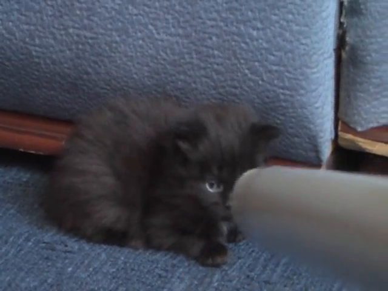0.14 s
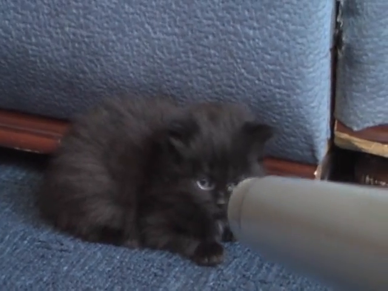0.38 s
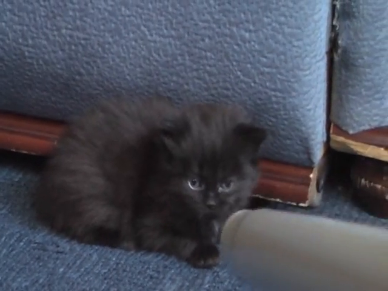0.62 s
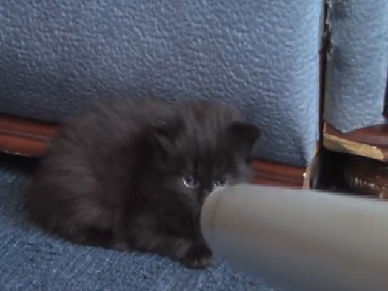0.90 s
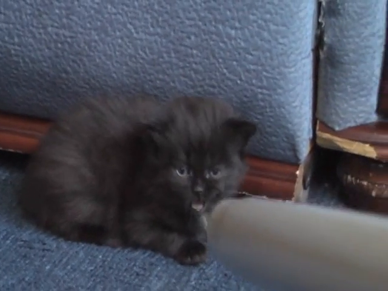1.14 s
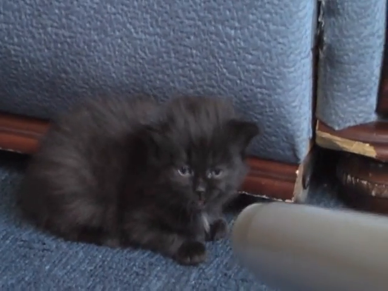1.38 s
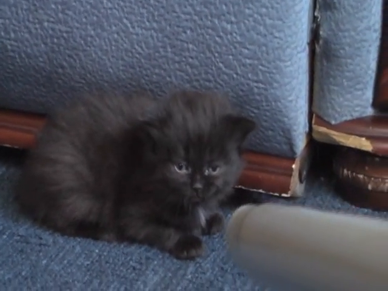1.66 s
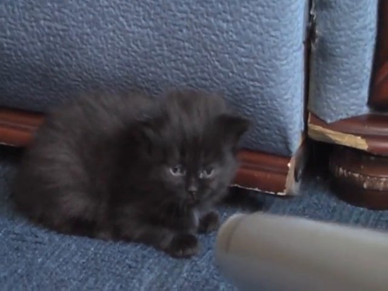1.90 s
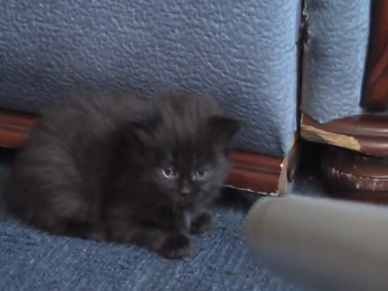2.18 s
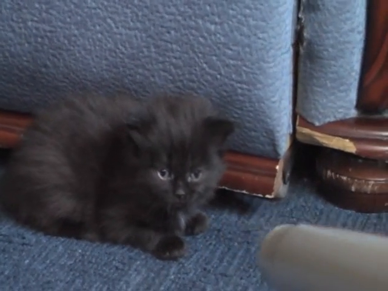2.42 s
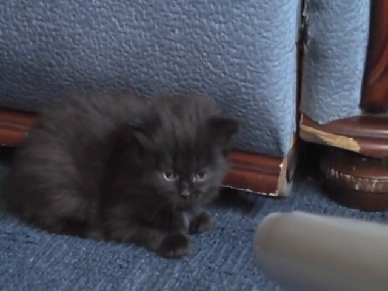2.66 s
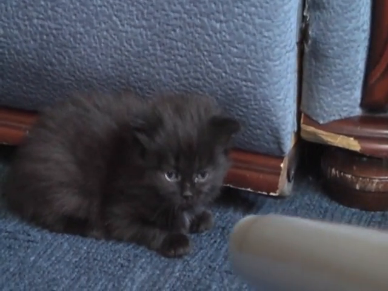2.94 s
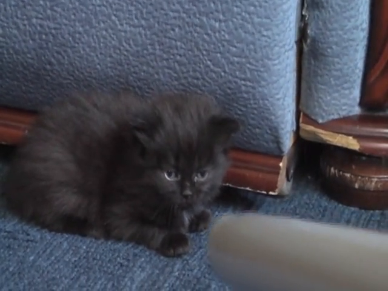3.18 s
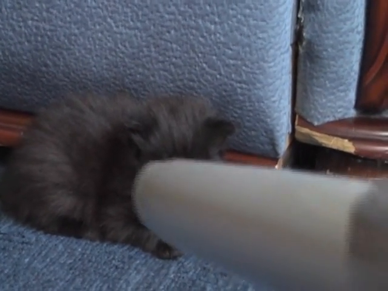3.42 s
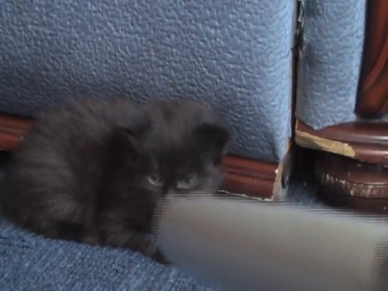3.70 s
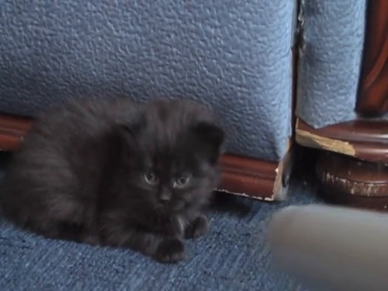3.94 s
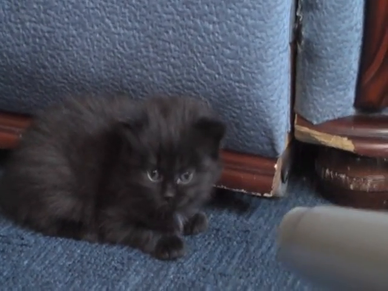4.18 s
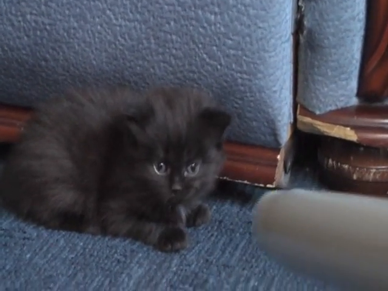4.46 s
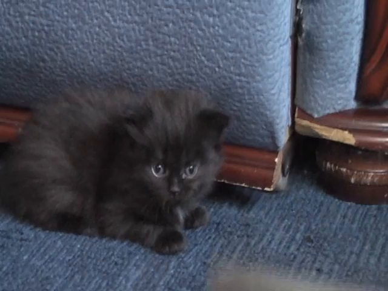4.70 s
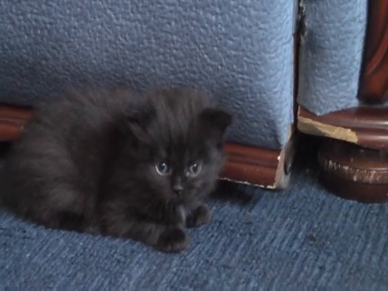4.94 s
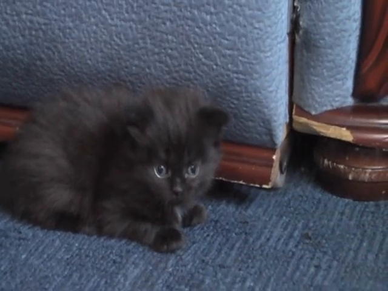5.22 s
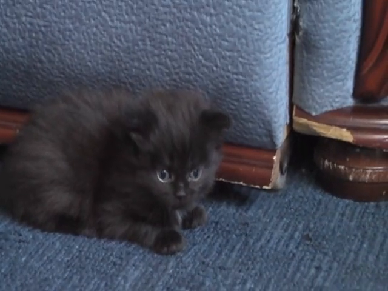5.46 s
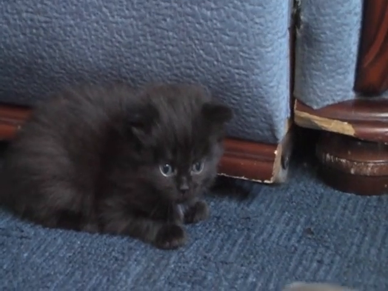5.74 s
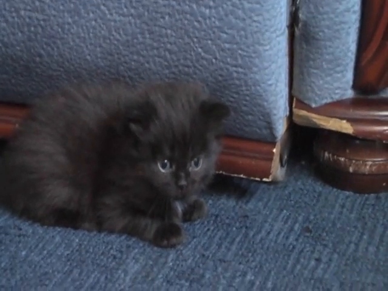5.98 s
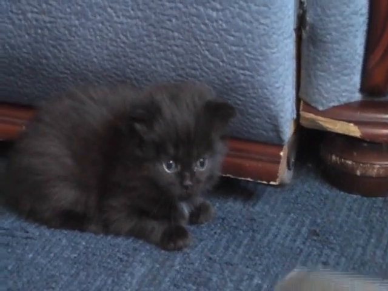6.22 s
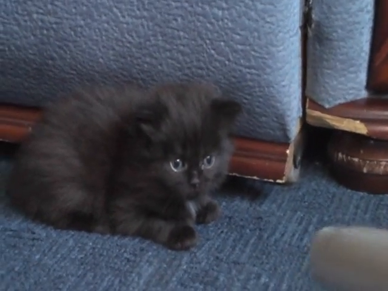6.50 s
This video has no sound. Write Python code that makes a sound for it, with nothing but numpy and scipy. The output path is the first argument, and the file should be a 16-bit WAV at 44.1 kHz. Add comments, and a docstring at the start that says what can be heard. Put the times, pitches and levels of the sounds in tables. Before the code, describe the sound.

From 0 s a vacuum cleaner is running at full, constant speed, close to a small stereo microphone in a carpeted, furnished room. A shrill fan whine near 5.3 kHz holds almost steady over a low shaft hum, a rough midrange housing roar and a dense, bright hiss of air. At first the whine leans left and is weaker; around 1.4 s it grows stronger and more central. From about 2.9 s breathy hissing bands glide through the rush, with quick puffs at 3.2-3.4 s. At 3.35 s everything cuts out for a few hundredths of a second, then returns dulled for a blink before brightness resumes. The whine dips, recovering after 4 s. Around 5.1-5.4 s the rush thins and brightens, with faint airy glides continuing. Near 6.5 s the air suddenly drops softer while whine and roar continue to the end at 6.6 s, without stopping.

```python
"""A vacuum cleaner runs in a carpeted room, its nozzle waved close to a small stereo microphone.
The motor hums at its shaft rate and its nine fan blades whine: sines locked to one shaft phase.
Air rushes into the nozzle: shaped noise, combed by echoes off floor and furniture. The housing roars
steadily: lower shaped noise. Breathy bands of noise glide where the nozzle mouth nears a surface.
The sound drops out once for 32 ms and returns dull and a little sharp for 29 ms."""
import sys
import numpy as np
from scipy import signal
from scipy.fft import rfft, irfft, next_fast_len
from scipy.io import wavfile
from scipy.ndimage import map_coordinates

SR = 44100
rng = np.random.default_rng(int(sys.argv[2]) if len(sys.argv) > 2 else 0)


def gain_from_db(level_db):
    """Convert decibel levels to linear amplitude factors (20 dB per decade)."""
    decades = np.asarray(level_db, float) / 20
    return 10 ** decades


def wav_record(signal):
    """Record a signal, one row per channel, as 16-bit PCM in the file named by sys.argv[1]."""
    frames = np.transpose(np.atleast_2d(signal))
    bounded = np.clip(frames, -1, 1)
    # unit amplitude maps onto the largest positive 16-bit level
    quanta = np.round(bounded * 32767).astype(np.int16)
    wavfile.write(sys.argv[1], SR, quanta)


N = 291501

# Levels are those of the sources, ahead of record().
# Blade-passing tone of the fan: t/s, f/Hz
BLADE_PITCH = [(0, 5288), (1.1, 5288), (1.3, 5291), (1.47, 5296), (1.8, 5293), (2.2, 5295), (2.6, 5296),
               (2.8, 5299), (3.0, 5294), (3.2, 5288), (3.45, 5286), (3.7, 5287), (4.2, 5291), (4.9, 5291),
               (5.2, 5293), (5.45, 5301), (5.9, 5302), (6.2, 5289), (6.45, 5283), (6.61, 5284)]
# Blade tone as the room's standing waves weigh it: t/s, level/dB, left-right/dB
BLADE_LEVEL = [(0, -18.5, -4.6), (0.6, -22.5, -8), (0.86, -20, -7), (1.02, -20.5, -6), (1.42, -15, -0.5),
               (2.0, -15.2, 0), (2.75, -17, 1.1), (3.1, -16.5, -1), (3.24, -21.5, -2.2), (3.45, -19.5, -5),
               (3.63, -24.5, -3.6), (3.91, -23, -3), (4.03, -19, -2.4), (4.15, -21.5, -2.2),
               (4.39, -19, -1.8), (5.11, -18, -2.4), (5.35, -15.3, -0.5), (5.59, -19.5, 2),
               (5.97, -15.5, 0.4), (6.31, -20, -3.4), (6.55, -26.5, -7), (6.61, -21, -6.6)]
# Overtones of the shaft: multiple of shaft rate, level/dB, left-right/dB
SHAFT_OVERTONES = [(2, -40.5, 3.5), (3, -39, -1), (4, -42.5, 7), (18, -50, -5)]
# Thin, nearly steady tones: f/Hz, level/dB
THIN_TONES = [(100, -49), (1378, -42), (9172, -45), (13090, -46), (14215, -55), (15420, -58)]
# Air at the nozzle: t/s, rush level/dB, treble lift/dB
RUSH = [(0, -17, -1), (0.4, -15.5, -1), (1.05, -15.5, -2.2), (1.4, -18, 0), (1.68, -16.4, -1),
        (2.3, -17, 0), (3.05, -17, 0.2), (3.45, -16, 0), (4.9, -16.1, 0), (5.05, -18.5, 0.5),
        (5.14, -17, 2), (5.2, -19.8, 1.5), (5.41, -19.6, 2.5), (5.47, -17, 1), (6.1, -17.5, 0.5),
        (6.49, -15.5, -0.3), (6.52, -24.5, 5), (6.61, -24.5, 4.5)]
# Swells and sags of the rush as the nozzle brushes past something: t/s, half length/s, peak/dB
GUSTS = [(3.188, 0.065, 2), (3.336, 0.049, 2), (3.43, 0.048, 1.5), (5.603, .08, -1.5), (6.18, 0.09, -2)]
# Spectrum shape of the air: f/Hz, relative level/dB
AIR_SPECTRUM = [(700, -25), (1200, -20), (1600, -16.5), (2300, -9.5), (3200, -8), (4600, -7), (6500, -7),
                (8600, -8), (9600, -12.5), (11500, -16), (12500, -17), (14000, -21), (15700, -22),
                (16200, -26)]
# Spectrum shape of the diffuse share, opposite in the two capsules: f/Hz, relative level/dB
DIFFUSE_SPECTRUM = [(12, -40), (20, -18), (1000, -15), (1400, -13), (2300, -18), (3300, -11), (5100, -13.5),
                    (7000, -13), (9800, -3), (11000, -8.5), (13000, -17), (14300, -20), (15700, -32)]
# Strongest echo, off the floor, following nozzle height: t/s, delay/ms
FLOOR_ECHO = [(0, 0.909), (3.2, 0.907), (3.7, 0.882), (4.3, 0.886), (5.28, 0.966), (5.75, 0.98),
              (6.3, 0.938), (6.61, 0.932)]
# Other echoes, each changing once as the nozzle turns; negative strength inverts the wave:
# t of turn/s, delay before/ms, strength before/1, delay after/ms, strength after/1
TURNED_ECHOES = [(5.2, 0.5, -0.15, 0.53, -0.02), (3.15, 1.2, 0.0013, 1.212, 0.12),
                 (4.65, 0.313, -0.077, 0.358, 0.11), (3.2, 0.209, 0.093, 0.19, -0.032),
                 (3.75, 0.58, -0.054, 0.635, 0.053), (5.2, 0.65, 0.0066, 0.64, -0.11)]
# Spectrum shape of the roar: f/Hz, relative level/dB
ROAR_SPECTRUM = [(12, -50), (20, -21.5), (90, -25.5), (140, -20.5), (200, -10.5), (300, -5.5), (520, -9),
                 (700, -5.5), (900, -9.5), (1200, -10.5), (1850, -10.5), (2400, -12), (4000, -16),
                 (8000, -23)]
# Resonances and dips of housing, hose and room: f/Hz, width/Hz, peak/dB
RESONANCES = [(163, 20, 0.5), (205, 32, 2.5), (230, 15, -2.5), (367, 20, 6), (400, 17, -5), (432, 57, 3.5),
              (758, 57, -6), (900, 99, 2.5), (1001, 67, -12), (1175, 80, 4), (1530, 130, 3),
              (1822, 190, -5.5), (2880, 130, -1.5), (3500, 42, 1.5), (8400, 350, -2), (9200, 80, 4)]
# Gap between nozzle mouth and a near surface; rows that end before they start are silent:
# start t/s, end t/s, start f/Hz, end f/Hz, level/dB
MOUTH_BANDS = [(3.13, 3.28, 2420, 2480, -24), (2.9, 3.35, 7700, 7200, -28), (3, 3.9, 4000, 4800, -30),
               (3.6, 4.35, 3400, 3300, -30), (3.1, 4.7, 7950, 7650, -31.5), (3.3, 4.8, 9350, 9100, -33.5),
               (4.3, 5.3, 2200, 2383, -32), (4.8, 6.4, 8700, 8300, -30), (3.42, 4.05, 9950, 9900, -35),
               (5.2, 6.1, 9900, 9850, -36), (2.8, 3.35, 4400, 3500, -32), (3.05, 3, 7400, 8500, -35),
               (5.2, 6.05, 6350, 5700, -33), (5.45, 6.0, 4050, 3950, -34.5), (4.6, 4.3, 6300, 6550, -34),
               (4.4, 5.4, 6450, 6700, -28), (5.3, 6.0, 7500, 7400, -33.5), (6.15, 6.51, 6900, 6450, -28),
               (6.4, 6.3, 2100, 2310, -28)]
# Dropout: cut t/s, return t/s, end of dull stretch t/s
DROPOUT_S = (3.3492, 3.3812, 3.4105)
# Dull stretch: blade tone f/Hz, blade tone level/dB, rush level/dB, treble lift/dB
DULL = (5312, -18, -21, -3.0)

BLADES = 9
SHAFT_DB, ROAR_DB = -27.5, -19
DIFFUSE_DB = -8.5   # against the rush
FLOOR_ECHO_STRENGTH = 0.2
TURN_S = 0.24
MOUTH_FLUTTER_HZ = 195   # sets the width of each breathy band
LEFT_LAG_US = 12.2   # the machine stands a little to the right


def in_time(rows):
    """Columns of a curve, one value per sample."""
    s, *columns = np.transpose(rows)
    return [np.interp(np.arange(N) / SR, s, column) for column in columns]


def rms_one(x):
    """Scales to unit power."""
    return x / np.sqrt(np.mean(x ** 2))


def drift(rate_hz):
    """Random wander of rms 1: noise twice through a one-pole low-pass."""
    pole = np.exp(-2 * np.pi * rate_hz / SR)
    noise = rng.standard_normal(N + SR)
    return rms_one(signal.lfilter([1], [1, -2 * pole, pole * pole], noise)[SR:])   # skips the run-in


def coloured(spectrum, peaks=()):
    """Noise shaped by a spectrum and by bell-shaped peaks and dips; rms 1."""
    size = next_fast_len(N)
    hz = np.arange(size // 2 + 1) * SR / size + 1   # +1 keeps the log finite
    point_hz, point_db = np.transpose(spectrum)
    level_db = np.interp(np.log(hz), np.log(point_hz), point_db, left=-90, right=-90)
    for centre_hz, width_hz, peak_db in peaks:
        level_db += peak_db / (1 + (2 * (hz - centre_hz) / width_hz) ** 2)
    white = rfft(rng.standard_normal(size))
    return rms_one(irfft(white * gain_from_db(level_db), size)[:N])


def panned(x, pan_db):
    """Two channels that differ in level by pan_db, left over right."""
    return x * gain_from_db(np.multiply.outer([0.5, -0.5], pan_db + np.zeros(N)))


def dull_stretch():
    """True from the cut to the end of the dull stretch."""
    s = np.arange(N) / SR
    return (s > DROPOUT_S[0]) & (s < DROPOUT_S[2])


def motor():
    """Blade, shaft and overtone sines share one shaft phase; the thin tones wander on their own."""
    blade_hz, = in_time(BLADE_PITCH)
    blade_db, pan_db = in_time(BLADE_LEVEL)
    dull = dull_stretch()
    blade_hz[dull], blade_db[dull] = DULL[:2]
    shaft_phase = 2 * np.pi * np.cumsum(blade_hz + 0.8 * drift(8)) / SR / BLADES
    blade_gain = gain_from_db(blade_db + 0.42 * drift(7.1))
    out = panned(blade_gain * np.sin(BLADES * shaft_phase), pan_db)
    out += panned(gain_from_db(SHAFT_DB + 0.5 * drift(3.8)) * np.sin(shaft_phase), -0.8)
    for multiple, level_db, side_db in SHAFT_OVERTONES:
        gain = gain_from_db(level_db + 2.0 * drift(3.3))
        out += panned(gain * np.sin(multiple * shaft_phase), side_db)
    for hz, level_db in THIN_TONES:
        gain = gain_from_db(level_db + 2.0 * drift(1.9))
        phase = 2 * np.pi * np.cumsum(hz * (1 + 0.00038 * drift(5.3))) / SR
        out += gain * np.sin(phase)
    return np.sqrt(2) * out   # makes the levels rms


def echo_paths():
    """Delay in ms and strength of every reflection, one value per sample."""
    paths = [(in_time(FLOOR_ECHO)[0], FLOOR_ECHO_STRENGTH)]
    for s, delay_ms, strength, new_delay_ms, new_strength in TURNED_ECHOES:
        before = (s - TURN_S / 2, delay_ms, strength)
        after = (s + TURN_S / 2, new_delay_ms, new_strength)
        paths.append(in_time([before, after]))
    return paths


def nozzle():
    """Turbulent air, flickering in level and combed by moving echoes; its diffuse share swells with it."""
    rush_db, treble_db = in_time(RUSH)
    for s, half_s, swell_db in GUSTS:
        rush_db += swell_db * np.clip(1 - np.abs(np.arange(N) / SR - s) / half_s, 0, 1)
    dull = dull_stretch()
    rush_db[dull], treble_db[dull] = DULL[2:]
    air = coloured(AIR_SPECTRUM, RESONANCES)
    heard = air.copy()
    reflected = signal.filtfilt(*signal.butter(1, 16000, fs=SR), air)   # carpet and cloth eat treble
    for delay_ms, strength in echo_paths():
        source_index = np.arange(N) - delay_ms * SR / 1000
        heard += strength * map_coordinates(reflected, [source_index], order=3, mode="nearest")
    diffuse = gain_from_db(DIFFUSE_DB) * coloured(DIFFUSE_SPECTRUM) * [[1], [-1]]
    both = rms_one(heard) + diffuse
    low = signal.sosfiltfilt(signal.butter(1, 4500, fs=SR, output="sos"), both)
    rush_gain = gain_from_db(rush_db + 0.59 * drift(5.6) + 0.5 * drift(64))
    treble_gain = gain_from_db(treble_db + 0.47 * drift(3.1))
    return rush_gain * (low + treble_gain * (both - low))


def housing():
    """The steady low roar of motor and exhaust: noise through the resonances."""
    return gain_from_db(ROAR_DB + 0.16 * drift(3.9)) * coloured(ROAR_SPECTRUM, RESONANCES)


def mouth():
    """Each breathy band is slow noise carried up to a gliding pitch, faded in and out."""
    s, out = np.arange(N) / SR, np.zeros(N)
    for start_s, end_s, start_hz, end_hz, level_db in MOUTH_BANDS:
        glide_hz = np.interp(s, [start_s, end_s], [start_hz, end_hz])
        phase = 2 * np.pi * np.cumsum(glide_hz) / SR
        fade = np.clip(np.minimum((s - start_s) / 0.04, (end_s - s) / 0.025), 0, 1)
        band = drift(MOUTH_FLUTTER_HZ) * np.cos(phase) + drift(MOUTH_FLUTTER_HZ) * np.sin(phase)
        out += gain_from_db(level_db) * fade * band
    return out


def scene():
    """All sources, nearly centred; the left capsule hears them a few microseconds late."""
    left, right = motor() + panned(nozzle() + mouth() + housing(), -0.57)
    late = np.arange(N) - LEFT_LAG_US * SR / 1e6
    return np.array([map_coordinates(left, [late], order=5, mode="nearest"), right])


def band_limit(x):
    """A steep low-pass at the top of the band."""
    return signal.sosfilt(signal.butter(12, 16390, fs=SR, output="sos"), x)


def record(dry):
    """A silent gap, soft overload, then a steep treble cut."""
    s = np.arange(N) / SR
    live = (s < DROPOUT_S[0]) | (s > DROPOUT_S[1])
    overloaded = 1.644 * np.tanh(dry * live / 1.554)
    treble_cut = signal.ellip(10, 0.3, 60, 15680, fs=SR, output="sos")   # order, ripple/dB, stop/dB, f/Hz
    mix = signal.sosfilt(treble_cut, overloaded)
    return band_limit(mix)


dry = scene()
out = record(dry)
wav_record(out)
```